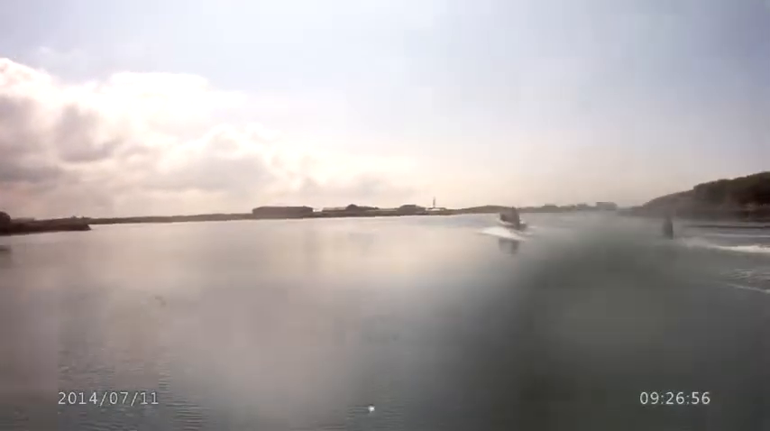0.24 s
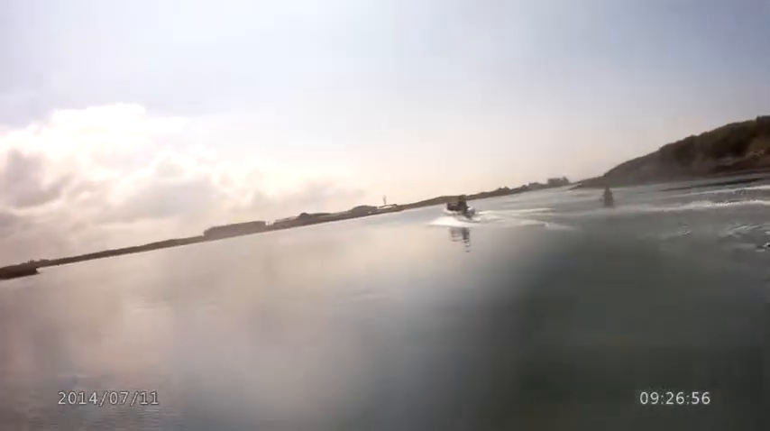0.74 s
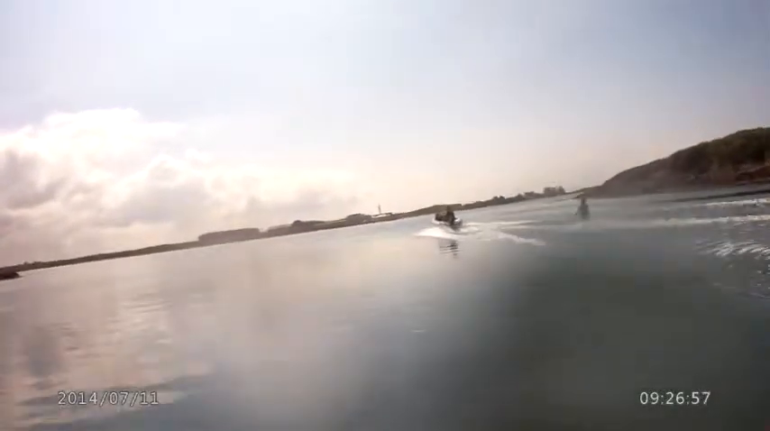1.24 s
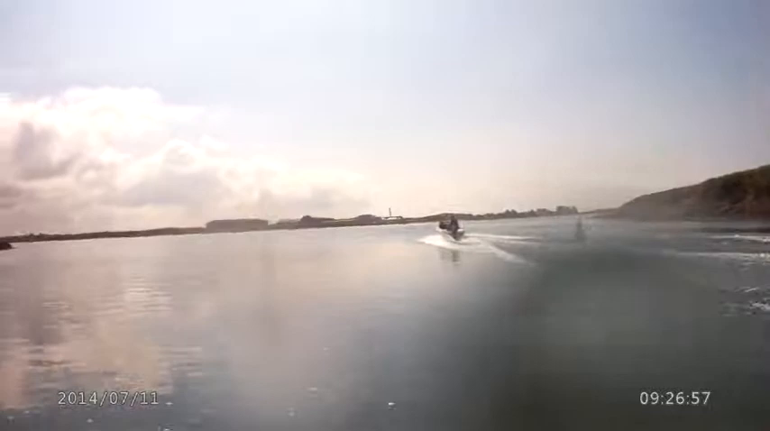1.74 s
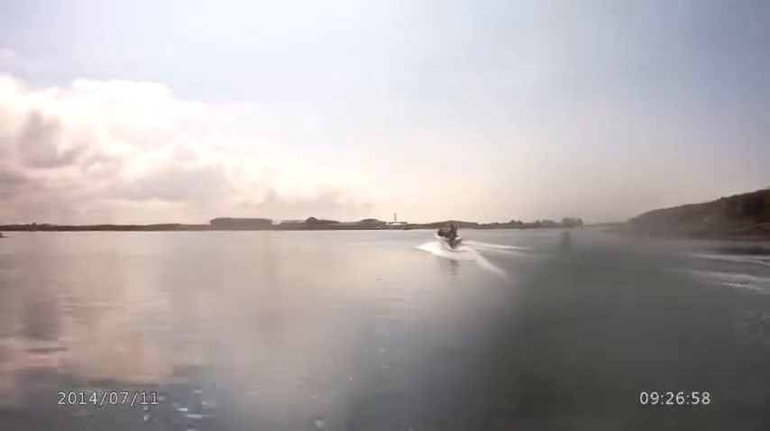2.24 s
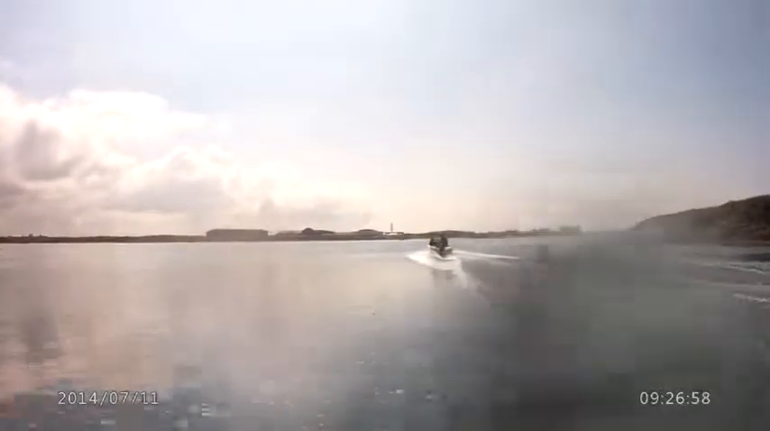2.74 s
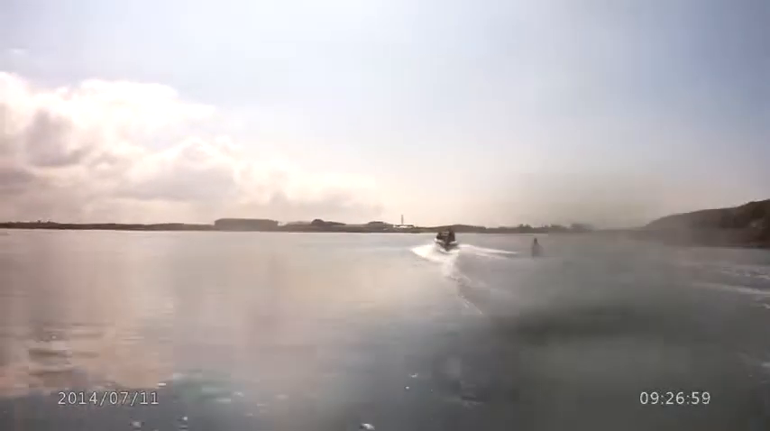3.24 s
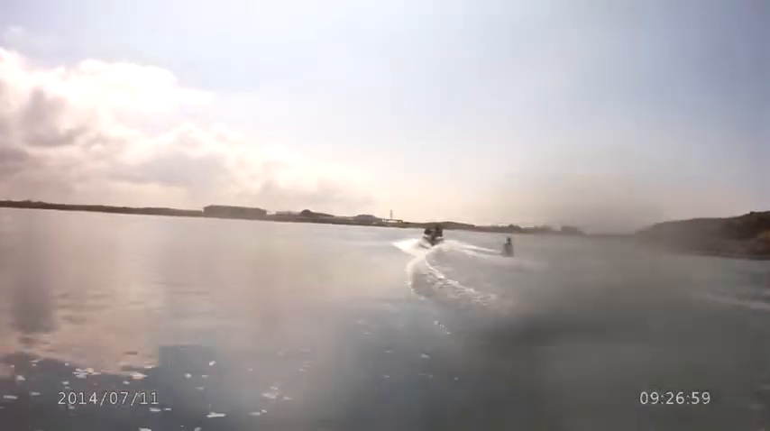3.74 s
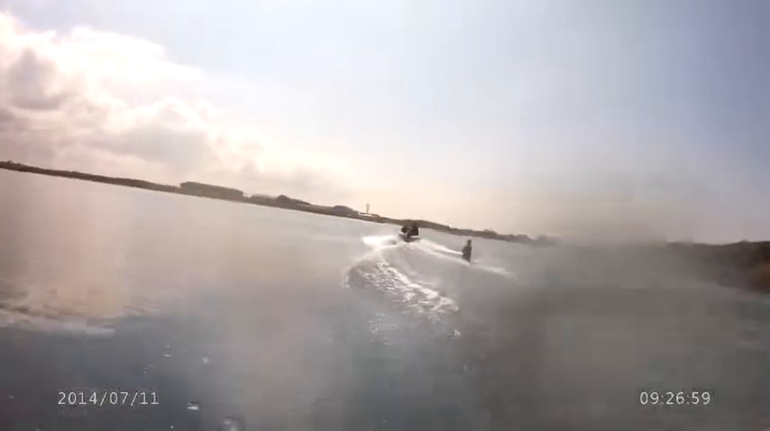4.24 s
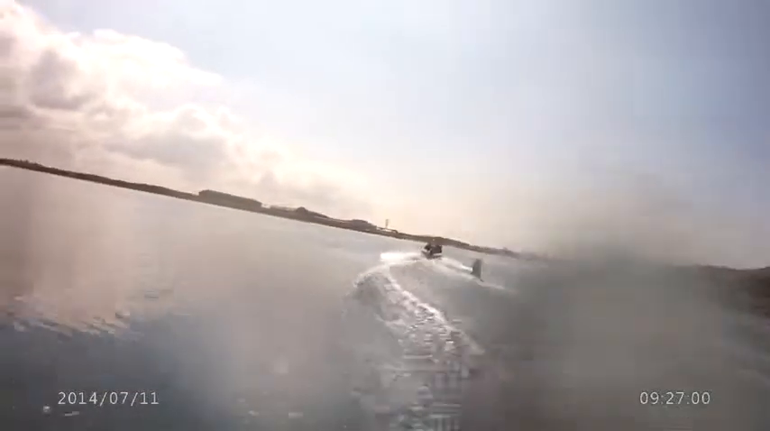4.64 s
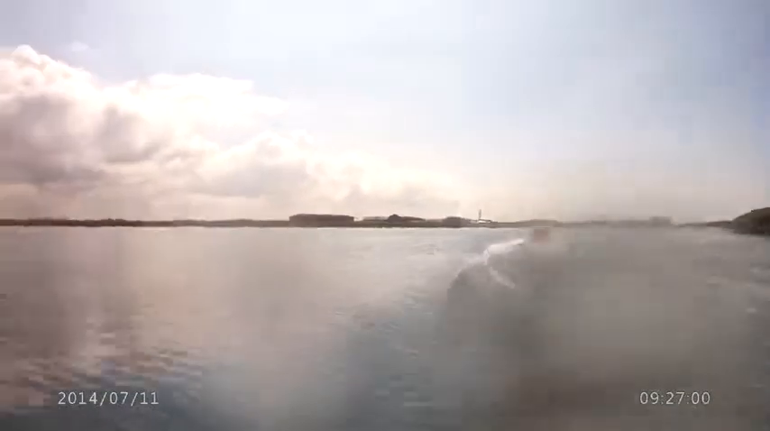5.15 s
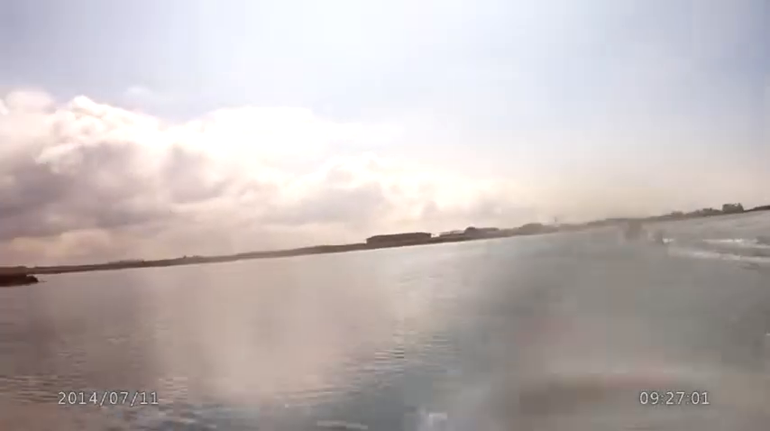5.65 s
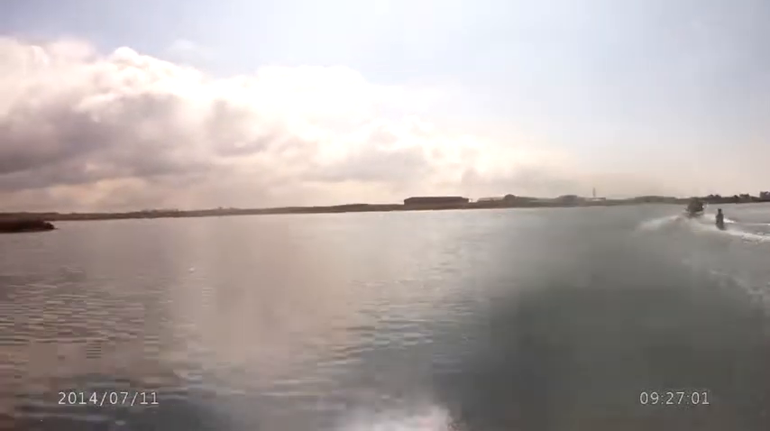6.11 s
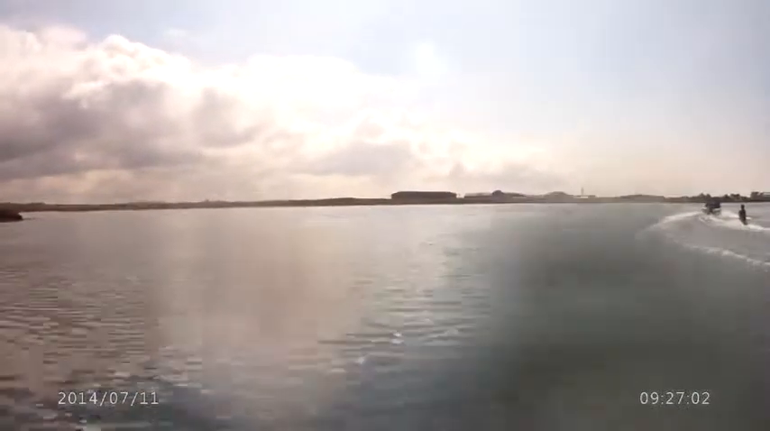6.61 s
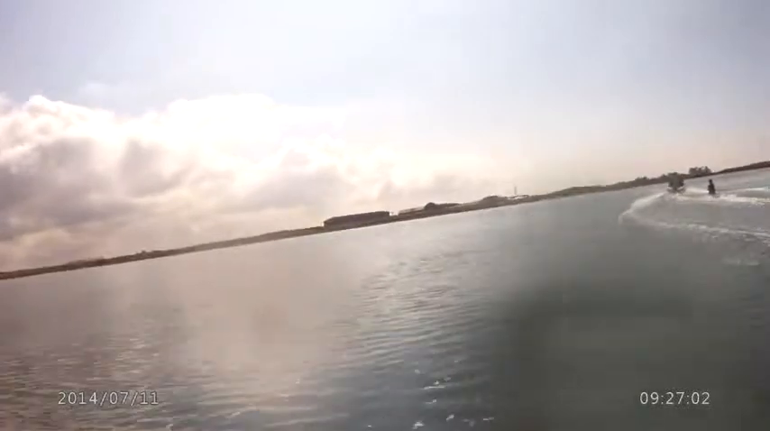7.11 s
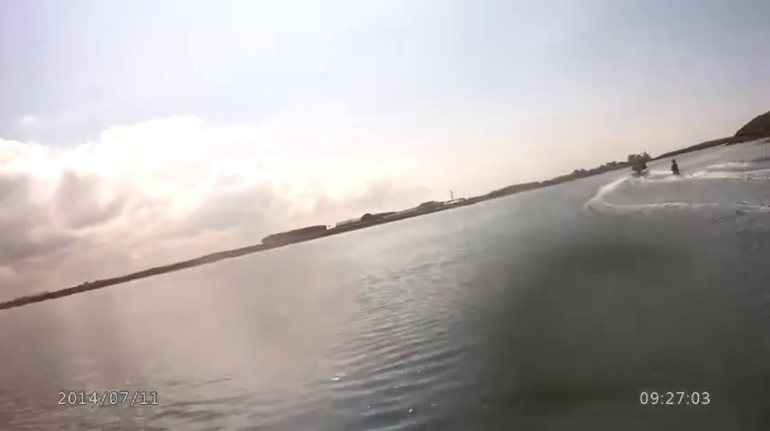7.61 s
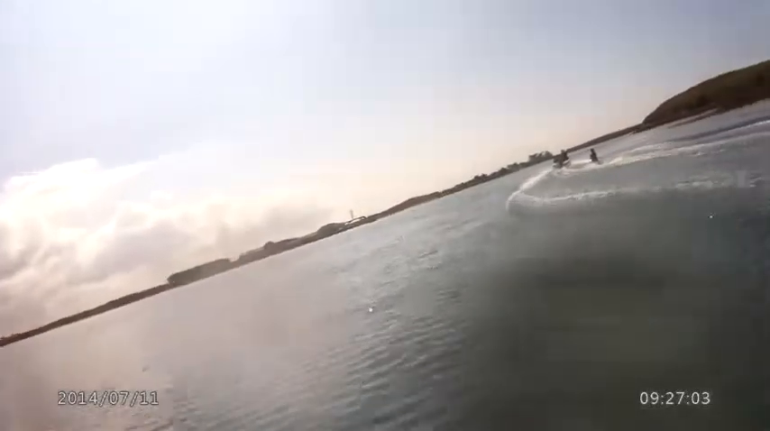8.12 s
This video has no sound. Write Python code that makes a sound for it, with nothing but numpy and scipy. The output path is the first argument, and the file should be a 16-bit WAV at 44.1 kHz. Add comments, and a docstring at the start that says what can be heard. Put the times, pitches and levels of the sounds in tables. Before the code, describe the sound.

A personal watercraft's two-stroke engine drones over open water, its revs wavering at first, then rising, holding and climbing again near the end. The microphone rides on board in a waterproof case that chatters in its mount and gives occasional sharp knocks. Water rumbles against the hull and rushes behind, while bursts of spray hiss over the case and wind buffets it.

```python
"""A two-stroke exhaust drones, eases off and picks up again: a personal watercraft on open water,
heard from a camera in a waterproof case on board. Firing pulses ring the resonances of pipe and hull,
and turbulent gas roars through the hull, all growing with the engine's load. The drone makes the case
chatter in its mount and overloads the microphone; waves throw spray and gusts over it."""
import sys
import numpy as np
from scipy import signal
from scipy.fft import rfft, irfft, next_fast_len
from scipy.io import wavfile
from scipy.ndimage import uniform_filter1d

SR = 44100
rng = np.random.default_rng(int(sys.argv[2]) if len(sys.argv) > 2 else 0)


def master(y):
    """Save y as 16-bit WAV."""
    cut = np.clip(np.atleast_2d(y).T, -1, 1)
    pcm = np.round(cut * 32767)  # scale
    wavfile.write(sys.argv[1], SR, pcm.astype(np.int16))


N = 369100
TIME = np.arange(N) / SR

# the hull meets a wave: (time [s], length [s], gust level [dB], smothering of the second order [dB])
WAVE_IMPACTS = [(1.062, 0.11, -19, 7), (1.95, 0.18, -20, 0), (6.5, 0.15, -16, 7.5), (8.2, 0.042, -16, -1.5)]
# sheets of spray hit the case: (time [s], length [s], level [dB], relative level of their chatter [dB])
SPRAY_SHEETS = [(0.277, 0.21, -34.5, -53.5), (1.112, 0.073, -29, -38), (1.224, .14, -32.5, -33.5),
                (1.936, 0.17, -29.5, -53), (2.215, 0.13, -34, -41), (2.445, 0.044, -36, -36),
                (6.57, 0.24, -31, -35), (6.825, 0.078, -26, -40), (7.582, 0.19, -27.5, -33),
                (8.183, 0.79, -30, -34)]


def from_db(db):
    """Decibels to amplitude ratio."""
    return 10 ** (np.asarray(db) / 20)


def rms_one(x):
    """Normalisation to rms 1."""
    return x / np.sqrt(np.mean(x ** 2) + 1e-20)


def even(x):
    """Running normalisation: holds the rms near 1 over a sixth of a second."""
    x = rms_one(x)
    return x / np.sqrt(uniform_filter1d(x ** 2, size=7000) + 1e-6)


def in_time(rows):
    """Linear interpolation of each column of a curve at every sample."""
    times, *columns = np.transpose(rows)
    return [np.interp(TIME, times, column) for column in columns]


def swell(s, length_s):
    """A Gaussian envelope of height 1 around a moment."""
    return np.exp(-(2 * (TIME - s) / length_s) ** 2)


def drift(rate_hz):
    """Low-passed noise: a slow random fluctuation of rms 1."""
    step, settling = 40, 2000
    pole = np.exp(-2 * np.pi * step * rate_hz / SR)
    noise = rng.standard_normal(N // step + settling + 2)
    slow = signal.lfilter([1], [1, -2 * pole, pole * pole], noise)[settling:]
    return np.interp(np.arange(N) / step, np.arange(len(slow)), rms_one(slow))


def colour(x, spectrum):
    """Spectral shaping that preserves the power of white noise."""
    size = next_fast_len(N)
    hz, db = np.transpose(spectrum)
    log_hz = np.log(np.fft.rfftfreq(size, 1 / SR) + 1)
    gain = from_db(np.interp(log_hz, np.log(hz), db))
    return irfft(rfft(x, size) * rms_one(gain), size)[:N]


def coloured_noise(spectrum):
    """Gaussian noise of rms 1 with a given spectral shape."""
    return rms_one(colour(rng.standard_normal(N), spectrum))


def resonate(x, hz, width_hz):
    """A damped resonator with gain 1 at its peak."""
    r = np.exp(-np.pi * width_hz / SR)
    feedback = [1, -2 * r * np.cos(2 * np.pi * hz / SR), r * r]
    return signal.lfilter(np.array([1, 0, -1]) * (1 - r * r) / 2, feedback, x)


def band(x, hz, width_hz):
    """Two equal resonators in cascade, each width_hz wide, give steep flanks."""
    return resonate(resonate(x, hz, width_hz), hz, width_hz)


def body(x, modes):
    """Modal superposition: parallel resonances with deep valleys between them."""
    return sum(from_db(db) * band(x, hz, width) for hz, width, db in modes)


def splats(hits, spectrum, decay_s, rise_hz):
    """Impact noise: each hit excites a burst that decays exponentially; overlapping bursts add in power."""
    fall, rise = np.exp(-2 / (decay_s * SR)), np.exp(-2 * np.pi * rise_hz / SR)
    power = signal.lfilter([1 - rise], np.convolve([1, -fall], [1, -rise]), hits ** 2 + 1e-18)
    return colour(np.sqrt(power) * rng.standard_normal(N), spectrum)


def wind(level_db=-26.5, swing_db=4):
    """Turbulent pressure fluctuations buffet the case, harder at each wave."""
    # spectrum of the buffeting: (frequency [Hz], relative level [dB])
    buffeting = [(15, 14), (28, -31), (45, 5.5), (60, -2), (80, 2.5), (110, 2.5), (200, 3), (400, -77)]
    stream = from_db(level_db + swing_db * drift(2))
    gusts = sum(from_db(db) * swell(s, length) for s, length, db, _ in WAVE_IMPACTS)
    return (stream + gusts) * coloured_noise(buffeting)


def water(load_db, rumble_db=-22.5, rush_db=-32):
    """Flow noise grows with load: the hull drums on the water and the wake rushes behind it."""
    # spectrum of the drumming hull: (frequency [Hz], relative level [dB])
    hull_spectrum = [(40, -13), (80, -3), (115, -4), (175, 1), (235, 1), (275, -12), (320, -14.5),
                     (450, -13), (900, -52)]
    # spectrum of the wake: (frequency [Hz], relative level [dB])
    wake_spectrum = [(200, -12), (350, 8), (650, 2.5), (1200, -6.5), (2200, -14), (2700, -6.5), (4500, -9),
                     (6100, -12), (7000, -18.5), (9400, -17), (10300, -19.5), (15000, -27)]
    rumble = from_db(rumble_db + 0.31 * load_db) * coloured_noise(hull_spectrum)
    rush = from_db(rush_db + 0.93 * load_db) * coloured_noise(wake_spectrum)
    return rumble + rush


def spray(load_db, mist_db=-37, drops_per_s=500, spread_db=9.5):
    """Drops hit the case as a Poisson process; fine mist and sheets of water add in power."""
    # spectrum of a drop's impact: (frequency [Hz], relative level [dB])
    drop_spectrum = [(900, -9), (2000, 7.5), (2800, -6), (4000, -0.5), (4700, 5), (5400, 0), (6050, 9),
                     (6700, -11.5), (8400, 4.5), (9600, -17), (10500, -18), (15000, -27)]
    mist = from_db(mist_db + 1.1 * load_db)
    sheets = sum(from_db(db) * swell(s, length) for s, length, db, _ in SPRAY_SHEETS)
    lands = rng.random(N) < drops_per_s / SR
    hits = lands * from_db(spread_db * np.minimum(rng.standard_normal(N), 1.5))
    return np.hypot(mist, sheets) * even(splats(hits, drop_spectrum, decay_s=0.0017, rise_hz=300))


def case(x):
    """Resonances of the case's walls and cavity lift and swallow narrow bands of treble."""
    # peaks and dips: (frequency [Hz], width [Hz], gain [dB])
    response = [(3820, 260, -7), (6700, 500, -2), (7340, 400, 4), (7830, 270, -24), (8950, 350, -2),
                (9450, 300, 6), (12000, 260, -12), (14500, 450, -8), (15400, 500, -9)]
    for hz, width_hz, db in response:
        x = x + (from_db(db) - 1) * resonate(x, hz, width_hz)
    return x


def ticks(hits, decay_s, rise_hz):
    """Brief contacts between case and mount radiate broadband ticks."""
    # spectrum of a contact: (frequency [Hz], relative level [dB])
    contact_spectrum = [(500, 2.5), (1500, 8), (2800, -3.5), (3800, 5), (4400, 6.5), (5300, 1.5), (6100, 4),
                        (7500, 1), (8600, 1), (9600, 1.5), (10200, -3.5), (13300, -0.5), (15200, -9)]
    return splats(hits, contact_spectrum, decay_s, rise_hz)


def knocks(level_db=-8.5):
    """Hard impacts: the case strikes the end of its play."""
    # the hardest knocks: (time [s], relative level [dB])
    strikes = [(0.2389, -10), (0.7205, -6), (0.758, -6), (1.8945, -3), (2.7384, 0.5), (2.7692, -2.5),
               (3.145, -5), (3.3323, -1), (4.7216, -1), (5.311, -6), (5.8587, 1), (5.887, -10),
               (7.0624, -0.5), (8.1963, 7.5)]
    hits = np.zeros(N)
    for s, db in strikes:
        hits[int(s * SR)] = from_db(db + level_db)
    return ticks(hits, decay_s=0.00082, rise_hz=1200)


def soften(x, shaking, dull_db=-42.5, bright_db=-33.5, cutoff_hz=7500):
    """Brightness grows with impact strength: weak landings lose their treble."""
    firmness = np.clip((20 * np.log10(shaking) - dull_db) / (bright_db - dull_db), 0, 1)
    dull = signal.sosfiltfilt(signal.butter(2, cutoff_hz, fs=SR, output="sos"), x)
    return dull + firmness * (x - dull)


def chatter(angle, miss_chance=0.22, jitter_s=0.0013, spread_db=3.5, alternate_db=3.0, gain_db=4.5):
    """Forced rattling: the second order lifts the case twice a turn, once harder; most landings tick."""
    # shaking of the case in its mount: (time [s], relative level [dB])
    vibration = [(0, -39), (1.6, -38), (2.15, -34), (2.5, -39), (2.7, -33.0), (3.45, -31), (4.0, -36),
                 (4.35, -31.5), (4.65, -36.5), (4.9, -33), (5.9, -34), (6.38, -34.5), (6.7, -30.5),
                 (7.2, -35), (7.6, -34.5), (8.37, -31.5)]
    jolts = sum(from_db(db) * swell(s, length) for s, length, _, db in SPRAY_SHEETS)
    shaking = np.hypot(from_db(in_time(vibration)[0]), jolts)
    due = np.flatnonzero(np.diff(np.floor(angle / np.pi + 0.5)) > 0)
    stray, size = rng.standard_normal((2000, 2))[:len(due)].T
    lands = rng.random(2000)[:len(due)] > miss_chance
    strength_db = spread_db * np.minimum(size, 2) + alternate_db * (np.arange(len(due)) % 2)
    at = np.clip(due + (jitter_s * SR * stray).astype(int), 0, N - 1)
    hits = np.zeros(N)
    hits[at] = lands * from_db(strength_db)
    rattle = even(ticks(hits, decay_s=0.0016, rise_hz=1490))
    return shaking * from_db(gain_db) * soften(rattle, shaking)


def whirr(angle, throb_db=2.5):
    """Random excitation: the machinery keeps a bright resonance ringing, throbbing once a turn."""
    # strength of the whirr: (time [s], level [dB])
    levels = [(0.0, -30.5), (1.0, -31.3), (2.4, -33.5), (4.4, -34), (5.7, -36.5), (6.8, -34.5), (8.0, -31)]
    excitation = rng.standard_normal(N) * from_db(throb_db * np.cos(angle))
    return from_db(in_time(levels)[0]) * rms_one(band(excitation, hz=3445, width_hz=520))


def roar(angle, load_db, level_db=-23.5, throb_db=0.5, patchy_db=2.5):
    """Source and filter: turbulent gas puffs once a turn, and each hull resonance takes its own share."""
    # resonances that filter the roar: (frequency [Hz], width [Hz], relative level [dB])
    hull_modes = [(415, 150, -8), (485, 57, 5), (563, 59, -0.5), (773, 162, -3), (946.4, 157, -2.5),
                  (1089, 42, -6.5), (1515, 366, -9.5), (1654, 170, -12), (2024, 430, -12.5)]
    gas = 0
    for hz, width_hz, db in hull_modes:
        puffs = rng.standard_normal(N) * from_db(db + throb_db * np.cos(angle) + patchy_db * drift(37))
        gas = gas + band(puffs, hz, width_hz)
    return from_db(level_db + 0.86 * load_db) * rms_one(gas)


def firings(angle, uneven_db=3.0, jitter_s=0.00002):
    """A quasi-periodic pulse train: one pressure pulse a turn, never quite alike."""
    due = np.flatnonzero(np.diff(np.floor(angle / (2 * np.pi))) > 0)
    stray, size = rng.standard_normal((1000, 2))[:len(due)].T
    at = np.clip(due + (jitter_s * SR * stray).astype(int), 0, N - 1)
    pulses = np.zeros(N)
    pulses[at] = from_db(uneven_db * size)
    return pulses


def pipe_and_hull(pulses, load_db):
    """Impulse excitation: the firings make the pipe bark and the hull ring, at times with a hollow note."""
    # resonances of the exhaust pipe: (frequency [Hz], width [Hz], relative level [dB])
    pipe_modes = [(243, 29, 0.5), (474, 109, -0.5), (548, 104, -2)]
    # resonances of the hull: (frequency [Hz], width [Hz], relative level [dB])
    hull_modes = [(786, 126, 0.5), (886, 26, 4.5), (957, 33, 7), (1050, 270, -10), (1523, 360, -6),
                  (1986, 260, -4.5)]
    # response at cruising load: (time [s], pipe level [dB], hull level [dB])
    response = [(0.0, -27, -29.5), (0.6, -23, -36), (1.2, -26.5, -30.5), (2.5, -28, -30.5),
                (3.3, -20.5, -35), (3.65, -29.5, -33), (4.25, -23, -31.5), (4.55, -38, -41),
                (5.0, -22, -30), (6.8, -27, -36), (7.2, -27, -30.5), (7.9, -51, -24.5)]
    # swells of the hull's hollow note: (time [s], length [s], level [dB])
    hollow_swells = [(0.7, .8, -42), (3.2, 0.19, -33), (4.997, 0.83, -28), (5.95, 0.77, -28)]
    bark_db, ring_db = in_time(response)
    bark = from_db(bark_db + load_db) * even(body(pulses, pipe_modes))
    ring = from_db(ring_db + load_db) * even(body(pulses, hull_modes))
    hollow_gain = sum(from_db(db) * swell(s, length) for s, length, db in hollow_swells)
    hollow = hollow_gain * even(band(pulses, hz=768, width_hz=140))
    return bark + ring + hollow


def exhaust(angle, crank_hz, cruise_hz=68, dispersion_rad=0.466, drone_db=0.7, buzz_db=-5.0):
    """Harmonics of the crank: the pipe delays higher orders more, and wave steepening adds a buzz."""
    # relative levels of the drone: (time [s], first order [dB], second order [dB], third order [dB])
    drone_levels = [(0, -15, -11.5, -8.5), (0.5, -18, -15, -9), (1.05, -20.5, -9, -11),
                    (1.85, -13.5, -10, -9.5), (2.48, -18.5, -8.5, -7), (2.7, -16.5, -3, -10.5),
                    (3.8, -19, -2.5, -5.5), (4.4, -20, -3, -8.5), (5.1, -19, -6.5, -7),
                    (5.65, -14, -5.5, -11.5), (6.3, -18.5, -6.5, -7), (6.8, -22.5, -4, -7),
                    (7.25, -18.5, -5, -11.5), (8.37, -12.5, -3, -8)]
    # overtones that follow the second order: (order, relative level [dB], change with speed [dB/Hz])
    overtones = [(4, -19, -0.63), (5, -24, 0.7), (6, -21.5, 1.9), (7, -26, -0.8), (11, -32.5, -0.7),
                 (13, -45, -1)]
    first_db, second_db, third_db = in_time(drone_levels)
    second_db -= sum(db * swell(s, length) for s, length, _, db in WAVE_IMPACTS)
    overspeed_hz = crank_hz - cruise_hz
    # water at the outlet shakes the low orders, most at low speed
    flutter_db = 0.61 + 0.0931 * np.maximum(-overspeed_hz, 0)
    pressure = np.zeros(N)
    for order, db in enumerate((first_db, second_db, third_db), 1):
        gain = from_db(db + drone_db + flutter_db * drift(11.4))
        pressure -= gain * np.cos(order * angle - dispersion_rad * order ** 2)
    for order, db, db_per_hz in overtones:
        level_db = second_db + buzz_db + db + db_per_hz * overspeed_hz
        pressure += from_db(level_db + 3.0 * drift(27)) * np.sin(order * angle)
    return pressure


def engine(load_db, speed_wobble=0.001995):
    """Phase locking: one crank angle times the firings, the roar, the whirr and the exhaust."""
    # engine speed: (time [s], crank rate [Hz])
    speeds = [(0, 60.6), (0.42, 62.8), (0.68, 60.9), (1.0, 62.6), (1.24, 59.6), (1.45, 61.2), (1.88, 59.2),
              (2.19, 59.5), (2.38, 64.8), (2.49, 62.2), (2.68, 68.2), (3.05, 69.3), (3.5, 68.6),
              (3.67, 66.9), (4.35, 69.2), (4.47, 66.8), (4.65, 68.2), (5.94, 68.0), (6.22, 66.5),
              (6.6, 67.9), (7.2, 69.1), (7.85, 73.3), (8.37, 75.1)]
    crank_hz, = in_time(speeds)
    angle = 2 * np.pi * np.cumsum(crank_hz * (1 + speed_wobble * drift(11.82))) / SR
    ringing = pipe_and_hull(firings(angle), load_db)
    sound = ringing + roar(angle, load_db) + whirr(angle) + exhaust(angle, crank_hz)
    return sound, angle


def scene(cruise_load_db=-26):
    """Superposition: engine, water, wind and impacts reach the microphone through the case."""
    # engine load: (time [s], level [dB])
    loads = [(0, -30.5), (2.5, -29), (3.0, -23), (3.45, -24.5), (3.65, -24.5), (4.3, -25), (4.55, -26.5),
             (5.5, -29), (6.25, -25.5), (6.44, -31.5), (6.65, -23), (7.2, -25.5), (7.6, -22.5), (8.37, -24)]
    load_db = in_time(loads)[0] - cruise_load_db
    motor, angle = engine(load_db)
    return case(motor + water(load_db) + wind() + chatter(angle) + knocks() + spray(load_db))[None]


def record(dry, ceiling=0.97, knee=13.0, cutoff_hz=15430):
    """Saturation flattens the drone's crests and chops the hiss with them; a low-pass cuts the top."""
    clipped = dry / (1 + np.abs(dry / ceiling) ** knee) ** (1 / knee)
    return signal.sosfilt(signal.ellip(10, 0.1, 90, cutoff_hz, fs=SR, output="sos"), clipped)


dry = scene()
out = record(dry)
master(out)
```